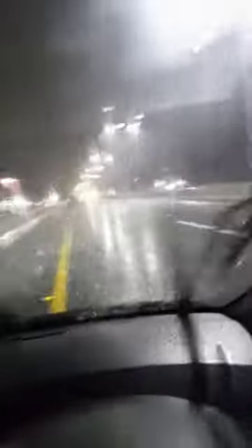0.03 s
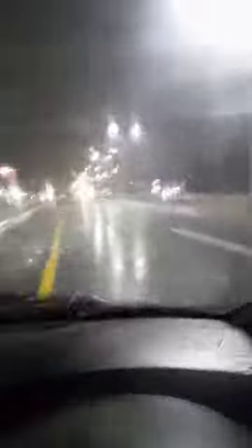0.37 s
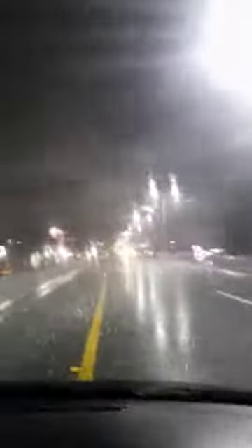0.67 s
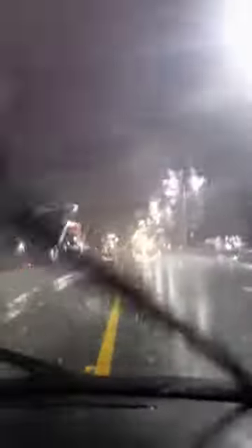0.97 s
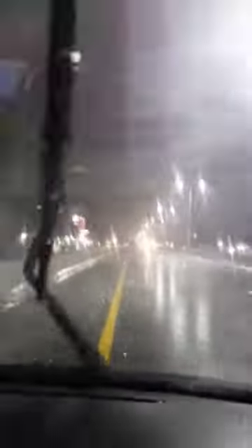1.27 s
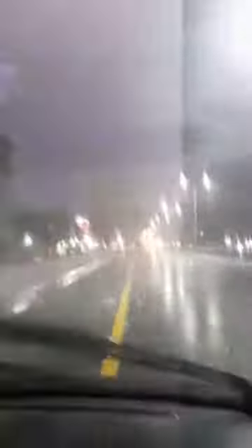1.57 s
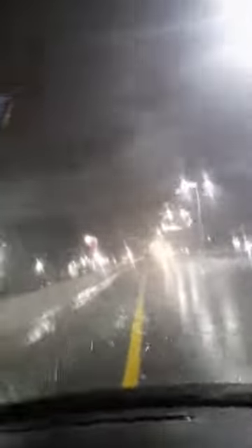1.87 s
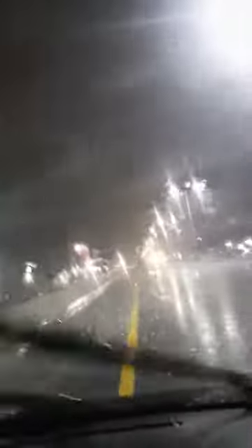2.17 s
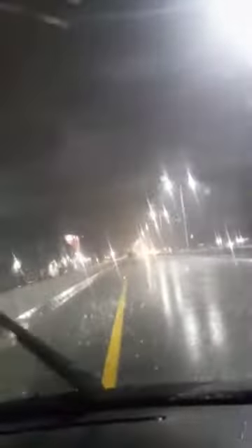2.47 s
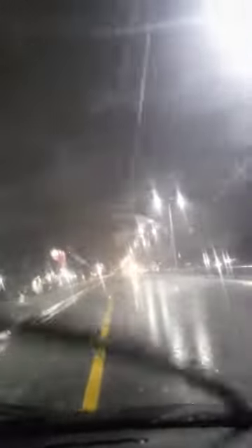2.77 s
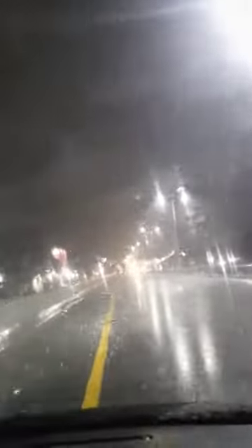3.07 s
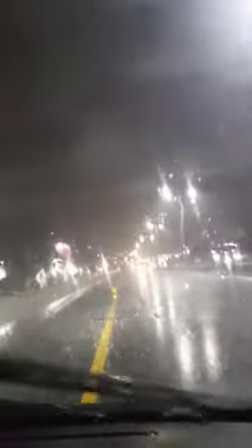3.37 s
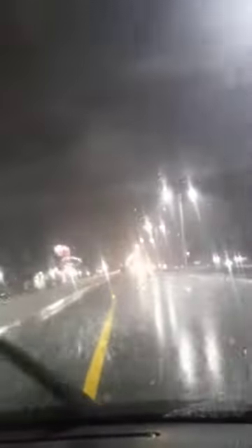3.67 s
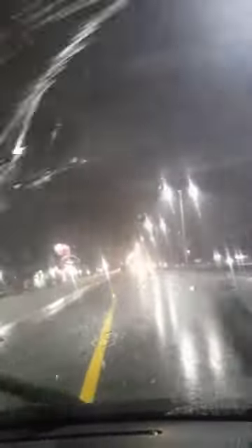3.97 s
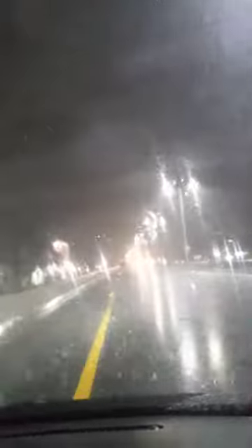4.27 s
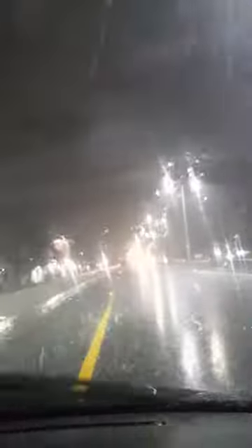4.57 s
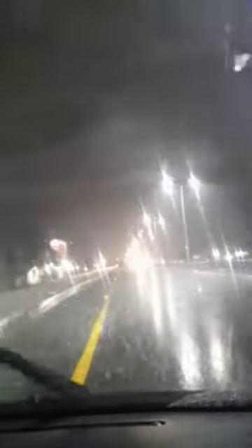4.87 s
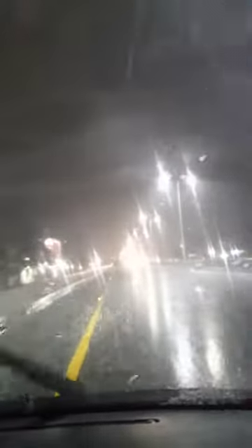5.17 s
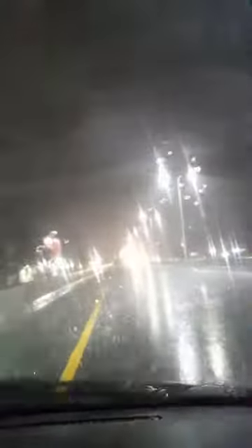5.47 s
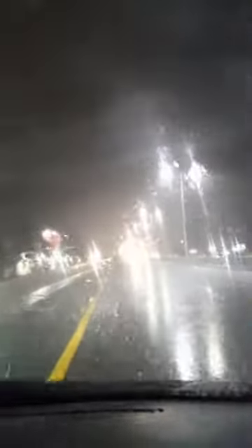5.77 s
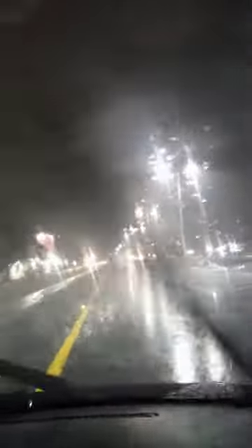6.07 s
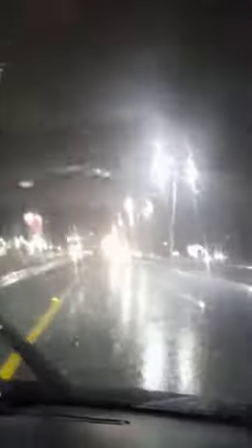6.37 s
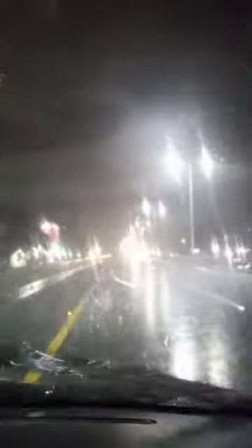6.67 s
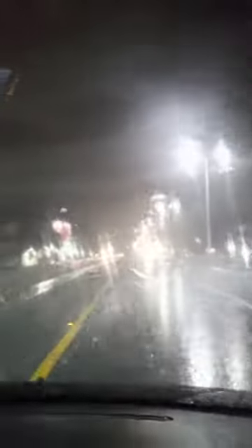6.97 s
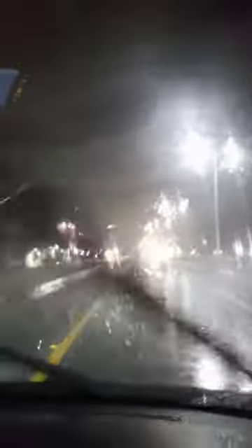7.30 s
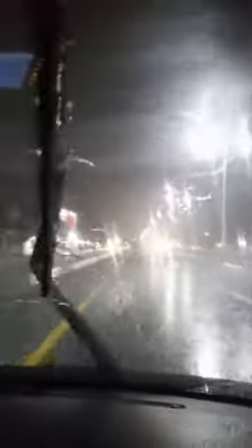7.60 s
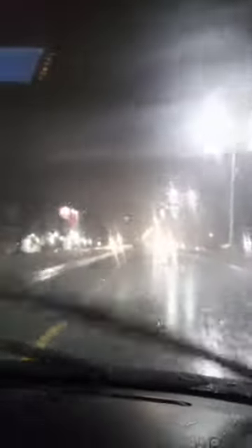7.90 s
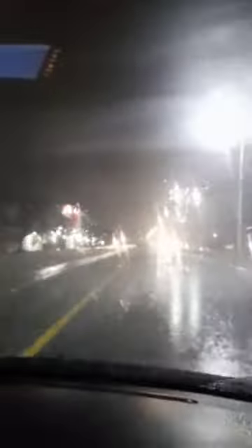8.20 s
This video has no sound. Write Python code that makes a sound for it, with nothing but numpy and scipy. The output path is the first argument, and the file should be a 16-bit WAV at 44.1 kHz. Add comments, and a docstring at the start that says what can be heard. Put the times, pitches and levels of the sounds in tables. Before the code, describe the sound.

Heavy rain and hail beat on a car as it drives, heard in stereo from the front seat. Irregular hard cracks and bright ticks hit the windshield, mixed with soft slushy bursts, while the metal roof rattles and knocks hollowly above. Dull wiper thuds come in regular pairs and boom through the cabin over a low tyre rumble. The patter slackens for a moment about two thirds through and then returns.

```python
"""Hail and heavy rain on a moving car, heard on a stereo microphone at the front seat.
Close ahead, stones crack on the windshield and set it ringing; pellets tick and slush bursts there.
Overhead, stones clack and rattle on the steel roof, in a dense patter that slackens briefly near 6 s.
The wipers thud at each end of their steady sweep and the cabin booms; from below, the tyres rumble."""
import sys
import numpy as np
from scipy import signal
from scipy.fft import rfft, irfft, next_fast_len
from scipy.io import wavfile

SR = 44100
rng = np.random.default_rng(int(sys.argv[2]) if len(sys.argv) > 2 else 0)


def master_out(mix):
    """Clip the mix to full scale and print it as 16-bit PCM to the path in sys.argv[1]."""
    frames = np.transpose(np.atleast_2d(mix))
    ceiling = np.clip(frames, -1, 1)
    pcm = np.round(ceiling * 32767).astype(np.int16)
    wavfile.write(sys.argv[1], SR, pcm)


N = 372204

# Levels in the tables are relative: each layer adds its own gain.
# stones on the windshield: (time [s], crack [dB], ping [Hz], pane ring [dB], treble [dB], steel [dB])
GLASS_HITS = [(0.0204, -14.5, 2920, -26, -24, -20.5), (0.2276, -28, 4400, -26, -13, -44),
              (0.337, -22, 2680, -26.5, -14, -26), (0.398, -21, 3700, -20, -17, -18.5),
              (0.496, -15, 2420, -30, -26, -21.5), (0.6159, -20, 2410, -32, -24, -23.5),
              (0.6725, -8.5, 4100, -19.5, -21, -15.5), (0.7484, -18, 2570, -33, -16, -26),
              (0.8073, -19, 3800, -28, -34, -22), (0.8692, -11, 3460, -28.5, -18, -28),
              (0.9025, -23, 4430, -26.5, -17, -23.5), (1.0952, -31, 2590, -29.5, -21, -21.5),
              (1.2036, -17, 2750, -29, -18, -24), (1.35, -13, 5400, -29, -26, -20.5),
              (1.4079, -15, 5100, -22, -19, -17.5), (1.7156, -24, 2370, -25, -28, -19),
              (1.9489, -15, 2470, -27.5, -24, -20), (2.004, -21, 2440, -27, -17, -23.5),
              (2.2284, -7.5, 4850, -21.5, -14, -20.5), (2.2975, -25, 2440, -30, -23, -20),
              (2.3503, -11.5, 3440, -32, -32, -36), (2.5322, -4.5, 5000, -25, -22, -45),
              (2.6058, -14, 4870, -26.5, -35, -27), (2.6456, -7.5, 3570, -31, -20, -42),
              (2.662, -11, 3600, -28.5, -25, -41), (2.731, -5.5, 4220, -30, -16, -47),
              (2.7689, -11, 3370, -21.5, -23, -20.5), (2.8195, -7.5, 2310, -20, -21.5, -18.5),
              (2.9909, -19, 2520, -26.5, -31, -19), (3.344, -6, 5140, -32, -18, -48),
              (3.373, -15, 3680, -27, -24, -21), (3.4869, -18, 2700, -29, -30, -21),
              (3.56, -17, 6270, -29, -10, -22), (3.6492, -3.5, 6170, -19.5, -19, -20.5),
              (3.922, -11.5, 3430, -35, -22, -32), (3.9468, -21, 5470, -30, -12, -28),
              (3.994, -30, 6000, -26, -3, -45), (4.1126, -15, 2980, -28.5, -10, -43),
              (4.1706, -6, 3430, -20, -29, -29), (4.343, -15, 2540, -29, -25, -20.5),
              (4.518, -13.5, 3240, -29, -30, -22), (5.0404, -11, 3640, -29, -13, -22.5),
              (5.23, -8, 6200, -25, -26, -43), (5.3043, -10.5, 5740, -42, 0, -40),
              (5.4103, -4, 4150, -28, -23, -41), (5.5309, -23, 5770, -23, -19.5, -17.5),
              (5.63, -14.5, 3600, -35, -23, -47), (6.2219, -12, 2400, -28.5, -29, -22),
              (6.577, -14.5, 3010, -34, -22, -27.5), (6.5986, -8, 3760, -33, -23, -48),
              (6.6746, -17, 2460, -28.5, -13, -23.5), (6.828, -18, 3450, -37, -17, -27),
              (7.214, -18, 3480, -33, -16, -32), (8.0645, -19, 2700, -35, -22, -25.5),
              (8.31, -24, 4260, -30.5, -26, -28), (8.3736, -15.5, 3780, -26.5, -30, -22)]
# stones on the roof: (time [s], rattle [dB], spray [dB])
ROOF_HITS = [(0.06, -14, -47), (0.206, -11, -35), (0.241, -18, -26), (0.503, -12.5, -35),
             (0.942, -14.5, -28), (1.025, -20, -42), (1.062, -15.5, -50), (1.16, -19.5, -39),
             (1.321, -26, -39), (1.424, -18, -35), (1.475, -24, -32), (1.549, -17, -38),
             (1.576, -18.5, -33), (1.687, -23, -35), (1.852, -21, -53), (2.176, -23.5, -35),
             (2.207, -16, -32), (2.393, -18.5, -32), (2.592, -19.5, -40), (2.933, -12, -40),
             (3.026, -14, -28.5), (3.237, -21, -38), (3.295, -30, -35), (3.425, -18.5, -40),
             (3.733, -22, -34), (3.758, -20, -30.5), (3.808, -21, -39), (3.837, -19.5, -27),
             (3.868, -17.5, -34), (4.064, -21, -40), (4.15, -16, -28), (4.2, -16, -38),
             (4.253, -22.5, -32.5), (4.409, -28, -40), (4.594, -24, -44), (4.649, -20.5, -31),
             (4.667, -14.5, -28), (4.707, -23, -30.5), (4.79, -15, -31), (4.854, -13.5, -27.5),
             (4.907, -26, -35), (4.944, -16.5, -31.5), (5.091, -18.5, -36), (5.148, -19, -30.5),
             (5.243, -15, -23.5), (5.271, -13.5, -32), (5.373, -21, -36), (5.661, -21.5, -38),
             (5.723, -22, -44), (6.034, -20, -33), (6.07, -23, -35), (6.105, -16, -25.5), (6.122, -16, -32),
             (6.32, -17.5, -34), (6.347, -14.5, -34.5), (6.394, -18, -35), (6.457, -18.5, -38),
             (6.505, -15, -29.5), (6.57, -20, -40), (6.71, -15.5, -37), (6.738, -18.5, -28.5),
             (6.778, -17, -33), (6.816, -16.5, -35), (6.949, -14, -28.5), (6.961, -23, -41),
             (7.053, -21, -31), (7.138, -13.5, -29), (7.283, -15, -27), (7.452, -22, -35),
             (7.518, -14.5, -32), (7.551, -19.5, -33), (7.599, -19, -35), (7.629, -23, -46),
             (7.669, -23, -38), (7.777, -26, -39), (7.923, -20.5, -49), (7.95, -18.5, -40),
             (8.007, -19, -32), (8.135, -22, -41), (8.258, -18.5, -49)]
# ice pellets on the glass: (time [s], level [dB], pitch [Hz])
PELLET_HITS = [(0.382, -26, 5200), (0.3157, -30, 4560), (1.448, -20, 4300), (1.554, -24, 4800),
               (1.66, -41, 4000), (2.45, -28, 5460), (2.71, -28, 5700), (3.073, -46, 4500),
               (3.54, -22, 5000), (4.32, -25, 4170), (4.555, -25, 6320), (4.686, -17, 3610),
               (5.0634, -21, 4020), (5.46, -34, 4600), (6.5385, -23, 3370), (6.7196, -18, 3450),
               (6.779, -27, 3020), (7.6445, -22, 3460), (7.74, -37, 5000)]
# wet stones on the glass: (time [s], level [dB])
SLUSH_HITS = [(0.809, -30), (1.108, -27), (1.157, -32), (1.4745, -35), (1.717, -33), (2.104, -41),
              (2.469, -33), (2.936, -32), (2.989, -26), (3.1844, -45), (3.2274, -40), (3.2614, -43),
              (4.116, -29), (4.149, -24), (4.3694, -42), (4.665, -33), (4.705, -31), (5.144, -36),
              (5.1906, -36), (6.0644, -37), (6.1544, -34), (6.3245, -37), (6.952, -31), (7.053, -38),
              (7.5497, -31), (7.7044, -51), (7.7794, -39), (8.2614, -48), (8.31, -35)]
# strength of the rain and the icy grit: (time [s], level [dB])
FALL_LEVEL = [(0.0, -28), (0.08, -33), (0.16, -37.5), (0.3, -33.5), (0.56, -32), (1.15, -34.5),
              (1.3, -35.5), (1.42, -31), (1.6, -33.5), (2.1, -34.5), (2.45, -34.5), (2.56, -34.5),
              (2.91, -36.5), (3.1, -34.5), (3.22, -37), (3.5, -35), (3.63, -39.5), (3.8, -34.5), (4.6, -34),
              (5.03, -32.5), (5.57, -34.5), (5.78, -40), (5.98, -37.5), (6.15, -32), (6.5, -35.5),
              (6.64, -35), (6.8, -33.5), (7.1, -32), (7.42, -36), (7.62, -31.5), (7.87, -35), (8.15, -34),
              (8.34, -36.5), (8.44, -32)]
# wipers turning at the louder end: (time [s], thud [dB], cowl ring [dB])
WIPER_TURNS = [(0.1012, -11.5, -13), (1.368, -18, -12), (2.6346, -8.5, -13), (3.9016, -7, -9),
               (5.166, -20, -18), (6.4358, -10, -15), (7.7031, -9.5, -14)]
# the car's body shaking on its springs: (time [s], level [dB])
SHAKE_LEVEL = [(0.0, -43), (1.48, -48), (1.67, -36.5), (3.45, -33), (4.47, -43), (5.22, -33), (8.44, -37)]
# tyre rumble: (time [s], level [dB])
TYRE_LEVEL = [(0.0, -34), (0.4, -36), (0.75, -30.5), (1.2, -32), (1.45, -30), (2.3, -29.5), (2.65, -27.5),
              (2.98, -33.5), (3.2, -27.5), (3.8, -30), (4.47, -25.5), (4.72, -32.5), (5.2, -26),
              (5.55, -28.5), (5.72, -23.5), (5.93, -30.5), (6.0, -32.5), (6.15, -28), (6.6, -29.5),
              (6.8, -24.5), (7.0, -25.5), (7.35, -29), (7.7, -26), (7.9, -29), (8.44, -25.5)]

# spectrum of ice meeting glass: (frequency [Hz], level [dB])
CRACK = [(300, -29), (700, 8.5), (1500, -5.5), (2600, 4), (3400, 0.5), (6500, 5), (10000, -1.5),
         (16000, 2.5)]
# spectrum of the ringing pane: (frequency [Hz], level [dB])
GLASS = [(100, -20), (300, -16), (700, -29), (1600, 2.5), (2800, -4.5), (4200, 1), (6500, -3),
         (10000, -9.5), (16000, -10.5)]
# spectrum of the rattling steel: (frequency [Hz], level [dB])
STEEL = [(100, -7), (250, 3.5), (480, 2.5), (640, 1), (1000, 0), (1500, 3.5), (2100, -1.5), (2800, -10.5),
         (5000, -37), (16000, -25)]
# spectrum of a hard clack on the roof: (frequency [Hz], level [dB])
CLACK = [(200, -24), (500, -2), (750, 5.5), (1100, 4), (1600, -1), (2300, -2.5), (3200, -13.5), (6000, -20),
         (16000, -35)]
# spectrum of a wide panel's hollow knock: (frequency [Hz], level [dB])
PANEL = [(60, -35), (120, -10), (165, 2.5), (188, 9.5), (215, -5.5), (255, -0.5), (340, 4), (410, -1),
         (480, 4), (600, -10), (1000, -6), (3000, -51)]
# spectrum of splashing ice and water: (frequency [Hz], level [dB])
SPLASH = [(1200, -14), (2500, 1), (3800, 5), (5000, 0), (6600, -2.5), (10000, -13.5), (16000, -12)]
# spectrum of bursting slush: (frequency [Hz], level [dB])
SLUSH = [(1000, -14), (3300, 0), (6500, -3), (10000, -2), (16000, 5)]
# spectrum of the ring after a wiper thud: (frequency [Hz], level [dB])
THUD = [(40, -24), (110, 13), (200, -5), (310, 0), (480, -6), (800, -31), (3000, -79), (9000, -110)]
# spectrum of the tyres and the cabin's boom: (frequency [Hz], level [dB])
BOOM = [(30, -50), (52, -9.5), (66, 4.5), (80, -6.5), (95, -2.5), (118, -2), (150, -10), (220, -20),
        (600, -43), (3000, -73)]
# spectrum of the shaking body: (frequency [Hz], level [dB])
SHAKE = [(12, -32), (25, -20), (32, 2), (40, 2), (48, 4), (70, -7), (200, -72)]
# ring time of the glass: (frequency [Hz], t60 [s])
GLASS_T60 = [(300, 0.061), (1500, 0.076), (5000, 0.1), (14000, 0.11)]
# ring time of the steel panels: (frequency [Hz], t60 [s])
STEEL_T60 = [(200, 0.56), (1500, 0.2), (5000, 0.23), (14000, 0.075)]
# modes of the cowl under the wipers: (frequency [Hz], level [dB], t60 [s])
COWL_MODES = [(115, -5, 0.22), (180, -24, 0.17), (300, -11, 0.021), (337, -22, 0.09)]

# likeness of the cabin's sound at the two microphone ports: (frequency [Hz], correlation [-1 to 1])
PORT_LIKENESS = [(170, 1), (260, 0.94), (450, 0.73), (700, -0.1), (1100, 0.45), (1450, 0.1), (2300, 0.41),
                 (4000, 0.05)]
# balance between the ports: (frequency [Hz], left minus right [dB])
PORT_BALANCE = [(30, -7.5), (120, 0.1), (330, -1.6), (650, 4), (1000, -1.5), (1750, -5), (2700, 1.3),
                (8000, -1)]
# response of the microphone: (frequency [Hz], gain [dB])
MICROPHONE = [(6700, 0), (7300, -7.5), (8000, -17), (9500, -7.5), (12000, -2), (15500, -8), (16300, -27)]


def windshield(average_treble_db=-18.5):
    """Close ahead, each stone cracks at its own pitch, rings the pane and shakes the steel around it."""
    out = np.zeros((2, N))
    for s, crack_db, ping_hz, pane_db, treble_db, steel_db in GLASS_HITS:
        bright_db = treble_db - average_treble_db
        contact = stone_colour(CRACK, ping_hz, bright_db, ping_db=6, octaves=0.09)
        snap = crack(contact, snap_t60=0.008, echo_t60=0.04, echo_db=-12)
        pane = stone_colour(GLASS, ping_hz, bright_db, ping_db=7, octaves=0.07)
        add(out, s, amp(crack_db - 1) * snap)
        add(out, s, amp(crack_db - 18) * ping(ping_hz))
        add(out, s, amp(pane_db + 6) * ring(pane, GLASS_T60, attack=0.0021))
        add(out, s, amp(steel_db + 2.5) * ring(STEEL, STEEL_T60, attack=0.0035))
    return out


def roof():
    """Just overhead, stones clack on the steel, rattle it, knock on the wide panel and burst into spray."""
    out = np.zeros((2, N))
    for s, rattle_db, spray_db in ROOF_HITS:
        clack_hz = rng.uniform(700, 2480)
        spot = stone_colour(CLACK, clack_hz, bright_db=0, ping_db=7, octaves=0.15)
        add(out, s, amp(rattle_db - 4) * ring(spot, t60=[(1000, 0.11)], attack=0.0045, size=6144))
        add(out, s, amp(rattle_db - 5) * ring(STEEL, STEEL_T60, attack=0.006))
        add(out, s, amp(rattle_db - 13) * ring(PANEL, STEEL_T60, attack=0.005))
        add(out, s, amp(spray_db + 4) * ring(SPLASH, GLASS_T60, attack=0.003))
    return out


def pellets():
    """Small, hard pellets tick on the glass, each at its own pitch, over a faint scatter of icy grit."""
    def tick(hz):
        contact = stone_colour(CRACK, hz, bright_db=-1, ping_db=7, octaves=0.1)
        return crack(contact, snap_t60=0.008, echo_t60=0.05, echo_db=-10)

    grit = shower(lambda: tick(rng.uniform(2500, 6000)), rate=60, spread_db=1.5, spots=12)
    out = amp(curve(FALL_LEVEL) - 14) * grit
    for s, db, hz in PELLET_HITS:
        add(out, s, amp(db + 1) * tick(hz))
    return out


def slush():
    """Soft, wet stones burst on the glass: a small snap, then a short bright spray."""
    out = np.zeros((2, N))
    for s, db in SLUSH_HITS:
        add(out, s, amp(db + 3) * crack(SLUSH, snap_t60=0.005, echo_t60=0.099, echo_db=-2))
    return out


def rain():
    """All around the microphone, drops tick on the glass, patter on the roof and drum on wide panels."""
    ticks = shower(lambda: crack(SPLASH, snap_t60=0.007, echo_t60=0.13, echo_db=8),
                   rate=320, spread_db=0.5)
    patter = shower(lambda: crack(STEEL, snap_t60=0.015, echo_t60=0.19, echo_db=-4),
                    rate=430, spread_db=3.5)
    drumming = shower(lambda: crack(PANEL, snap_t60=0.0036, echo_t60=0.19, echo_db=-4, size=6144),
                      rate=170, spread_db=4.5)
    return amp(curve(FALL_LEVEL)) * (amp(-6) * ticks + amp(4) * patter + amp(6.5) * drumming)


def wipers(thud_hz=235, width_s=0.0028, return_s=0.52, boom_t60=0.74, size=8192):
    """Beyond the glass, the blades flip with a thud at each end; the cowl rings and the cabin booms."""
    out = np.zeros((2, N))
    t = np.arange(SR // 2) / SR
    lead_s = 3 * width_s  # the thud is centred on the turn
    from_turn = t[:size] - lead_s
    pulse = np.exp(-(from_turn / width_s) ** 2)
    thud = -pulse * np.sin(2 * np.pi * thud_hz * from_turn) * np.ones((2, 1))
    cowl = sum(amp(db - 60 * t / t60) * np.sin(2 * np.pi * hz * t) for hz, db, t60 in COWL_MODES)[:size]
    boom_envelope = amp(-60 * t / boom_t60) * (1 - np.exp(-t / 0.0042))
    for start, turn_db, cowl_db in WIPER_TURNS:
        turn = (start, turn_db, cowl_db, -26)
        other_end = (start + return_s, -19, -19, -27.5)
        for s, thud_db, ring_db, boom_db in (turn, other_end):
            dull_ring = amp(-10.5) * ring(THUD, STEEL_T60, attack=0.0012, size=size)
            add(out, s - lead_s, amp(thud_db) * thud)
            add(out, s, amp(ring_db) * (dull_ring - cowl))
            add(out, s, amp(boom_db) * boom_envelope * field(BOOM, len(t)))
    return out


def road():
    """From under the seat, the body shakes on its springs and the tyres rumble through the cabin."""
    shake = amp(curve(SHAKE_LEVEL) + 3) * field(SHAKE, N)
    tyres = amp(curve(TYRE_LEVEL) + 4.5) * field(BOOM, N)
    return shake + tyres


def stone_colour(spectrum, ping_hz, bright_db, ping_db, octaves, uneven_db=2.8):
    """A struck spot favours one resonance and stirs the others unevenly; harder ice is brighter."""
    hz = np.geomspace(100, SR / 2, 120)
    resonance = ping_db / (1 + (np.log2(hz / ping_hz) / octaves) ** 2)
    hardness = along([(4500, 0), (11000, bright_db)], hz)
    uneven = uneven_db * rng.standard_normal(len(hz))
    return np.transpose([hz, along(spectrum, hz) + resonance + hardness + uneven])


def crack(spectrum, snap_t60, echo_t60, echo_db, size=4096):
    """The direct snap of a contact, with a short wash of reflections off dashboard and windows."""
    t = np.arange(size) / SR
    onset = 1 - np.exp(-t / 0.0003)
    decay = amp(-60 * t / snap_t60) + amp(echo_db - 60 * t / echo_t60)
    return field(spectrum, size) * onset * decay


def ping(hz, t60=0.03, size=4096):
    """The struck spot sings briefly: three close modes beat, differently at each microphone port."""
    t = np.arange(size) / SR
    detune = 1 + 0.02 * rng.standard_normal((3, 1, 1))
    modes = np.sin(2 * np.pi * (hz * detune * t + rng.random((3, 2, 1)))).sum(0)
    return unit(modes) * amp(-60 * t / t60) * (1 - np.exp(-t / 0.00048))


def ring(spectrum, t60, attack, size=10240):
    """A struck plate: countless modes build up over the attack [s], then each band dies at its t60."""
    t = np.arange(size) / SR
    hz, frame_s, bands = signal.stft(field(spectrum, size), SR, nperseg=256)
    decay = amp(-60 * frame_s / along(t60, hz)[:, None])
    _, tail = signal.istft(bands * decay, SR, nperseg=256)
    return tail[:, :size] * (1 - np.exp(-t / attack))


def shower(strike, rate, spread_db, spots=8):
    """Random impacts at a total rate [1/s], on several spots that each have their own ring; rms 1."""
    out = np.zeros((2, N))
    for _ in range(spots):
        falls = rng.random(N) < rate / spots / SR
        sizes = amp(spread_db * np.clip(rng.standard_normal(N), -2, 2))
        signs = rng.choice([-1, 1], N)
        out += signal.oaconvolve((falls * sizes * signs)[None], strike(), axes=1)[:, :N]
    return unit(out)


def field(spectrum, size, right_lag_s=0.0003204):
    """Diffuse cabin noise at the two ports, rms 1: alike in the bass, nearly unrelated in the treble."""
    m = next_fast_len(size)
    hz = np.fft.rfftfreq(m, 1 / SR)
    width = np.arccos(np.clip(along(PORT_LIKENESS, hz), -1, 1)) / 2
    noise = rfft(rng.standard_normal((2, m))) * amp(along(spectrum, hz))
    mid, side = noise * [np.cos(width), np.sin(width)]
    lean = amp(along(PORT_BALANCE, hz) / 2) * np.exp(1j * np.pi * hz * right_lag_s)
    return unit(irfft([(mid + side) * lean, (mid - side) / lean], m)[:, :size])


def amp(db):
    return 10 ** (np.asarray(db) / 20)


def unit(x):
    return x / np.sqrt(np.mean(x ** 2) + 1e-20)


def along(points, hz):
    """Interpolate (frequency [Hz], value) points on a log axis."""
    point_hz, values = np.transpose(points)
    return np.interp(np.log(hz + 1), np.log(point_hz + 1), values)


def curve(points):
    """Interpolate (time [s], level [dB]) points to one level per sample."""
    return np.interp(np.arange(N) / SR, *np.transpose(points))


def add(track, s, sound):
    """Mix a stereo sound into the track at time s."""
    start = int(np.clip(round(s * SR), 0, N - 1))
    track[:, start:start + sound.shape[1]] += sound[:, :N - start]


def scene():
    """Hail, rain, wipers and road as they reach the front seat."""
    return windshield() + roof() + pellets() + slush() + rain() + wipers() + road()


def record(dry, top_hz=16600):
    """The microphone has a deep dip at 8 kHz and a band limit."""
    m = next_fast_len(N + SR // 2)
    hz = np.fft.rfftfreq(m, 1 / SR)
    response = amp(along(MICROPHONE, hz)) * (hz < top_hz)
    return irfft(rfft(dry, m) * response, m)[:, :N]


dry = scene()
out = record(dry)
master_out(out)
```